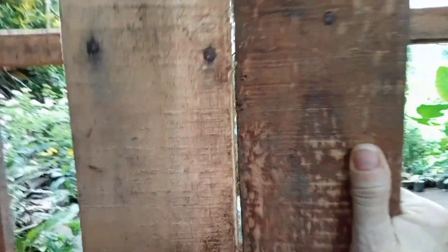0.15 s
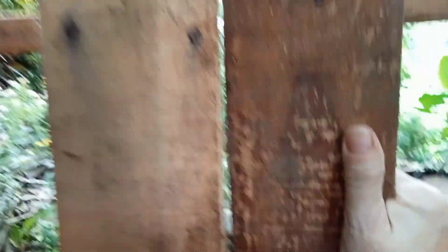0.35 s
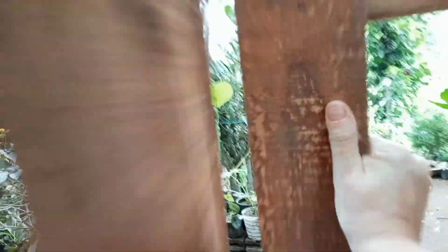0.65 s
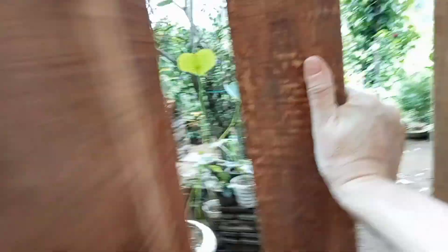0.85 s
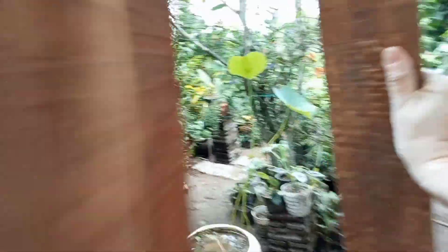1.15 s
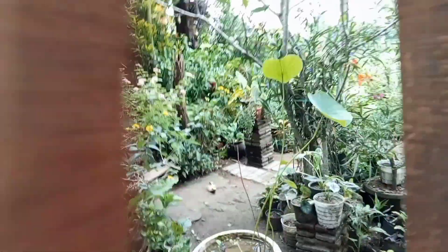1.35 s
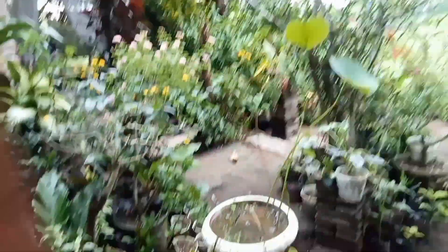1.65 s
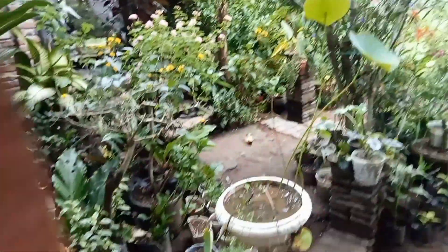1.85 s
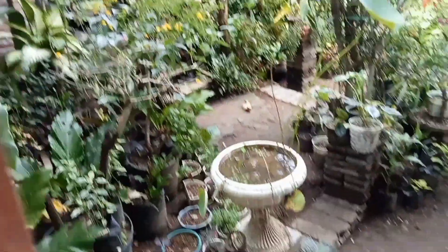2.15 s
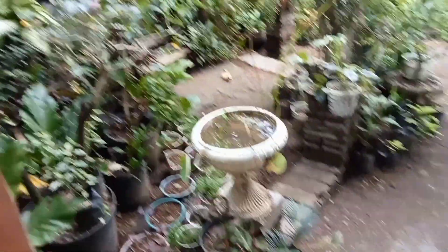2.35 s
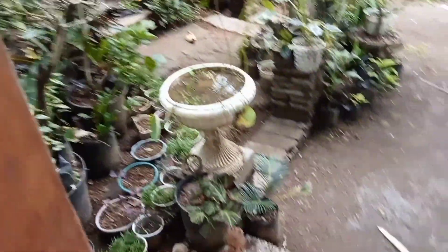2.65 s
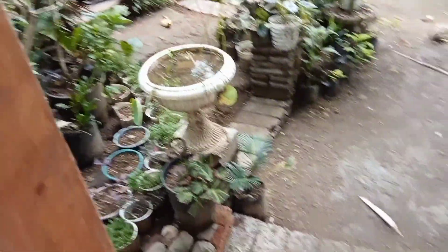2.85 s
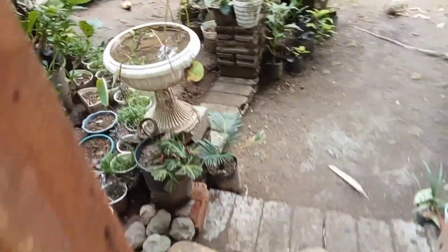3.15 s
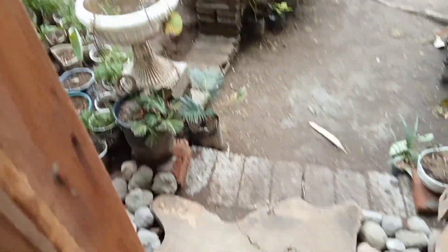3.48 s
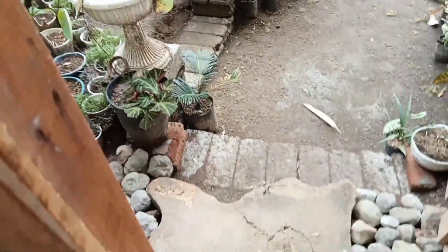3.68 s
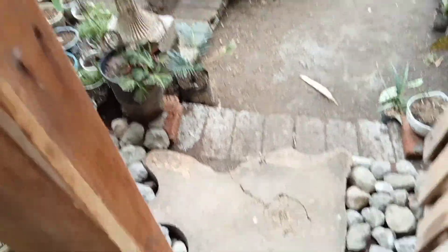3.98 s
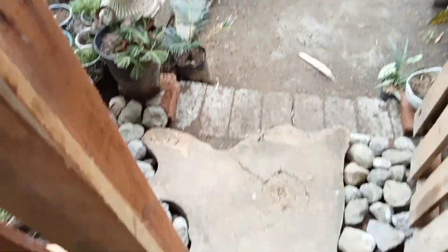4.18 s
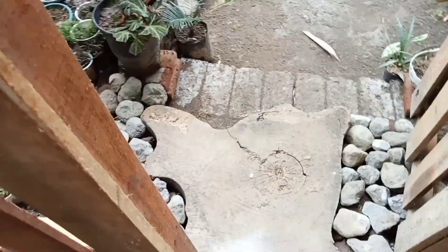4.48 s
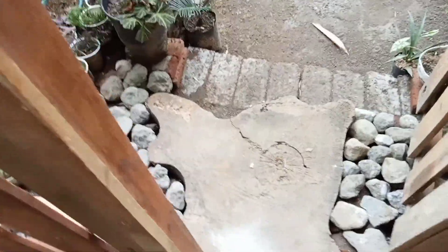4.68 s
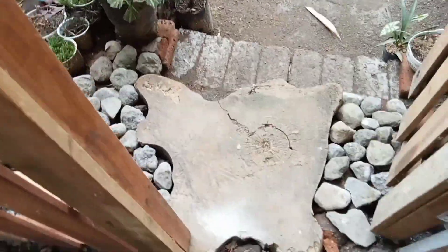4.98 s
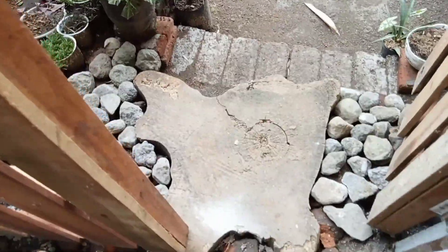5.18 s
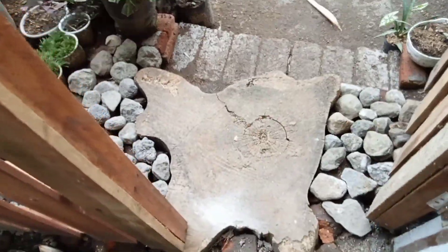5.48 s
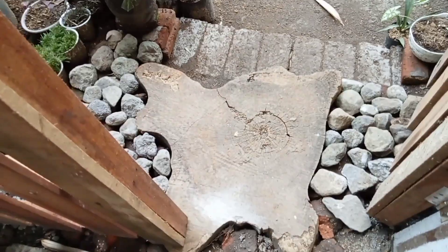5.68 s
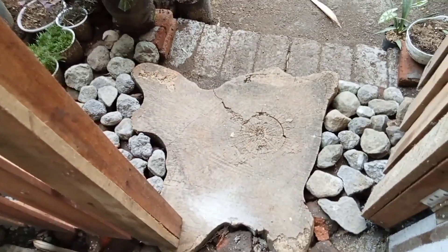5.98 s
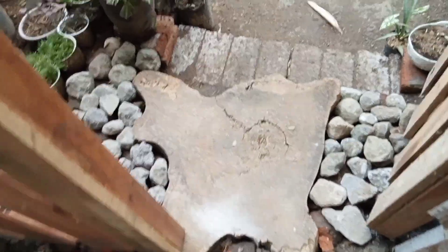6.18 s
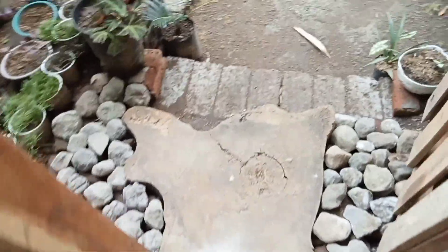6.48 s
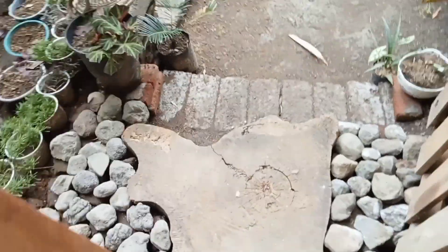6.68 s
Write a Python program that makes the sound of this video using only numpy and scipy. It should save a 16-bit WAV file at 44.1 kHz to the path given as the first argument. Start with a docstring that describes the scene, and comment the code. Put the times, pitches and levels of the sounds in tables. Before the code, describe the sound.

A hand bumps a wooden garden gate, which rubs against its post and jerks free with a loud, shuddering knock. The hinge gives a few tiny squeaks. Later come three slow flip-flop steps on a slab, the first a clear slap and the others duller, with gritty scuffs. Clothes rustle and small handling ticks sound close to the microphone, while insects drone and a distant bird calls faintly.

```python
"""A wooden garden gate rubs, judders free and squeaks; then come three slow steps and gritty scuffs.
The pushed gate grinds on its post until it lets go, and its hinge pin sticks and slips. Flip-flops slap
and drag on the slab between gate and fence. Clothes rustle and a hand-held camera ticks in the grip,
while insects drone, a far bird calls and a motor hums."""
import sys
import numpy as np
from scipy import signal
from scipy.fft import rfft, irfft
from scipy.io import wavfile
from scipy.ndimage import uniform_filter1d

SR = 44100
rng = np.random.default_rng(int(sys.argv[2]) if len(sys.argv) > 2 else 0)


def bounce(signal):
    """Save signal as a 16-bit WAV file at the path given by the first command-line argument."""
    frames = np.transpose(np.atleast_2d(signal))
    limited = np.clip(frames, -1, 1)
    pcm = np.round(limited * 32767).astype(np.int16)
    wavfile.write(sys.argv[1], SR, pcm)


N = 301203

# Tone colours of noises and clicks. Each row: frequency in Hz, relative strength there in dB.
AIR_COLOUR = [(20, -36), (40, -14), (60, -4.5), (90, -1), (170, -4), (270, -6.5), (520, -12), (800, -10),
              (1300, -14.5), (2850, -17.5), (6200, -27.5), (9500, -27), (11500, -33.5), (15500, -41)]
NEAR_INSECT_COLOUR = [(6000, -34.5), (6600, -18), (7100, -12.5), (7900, -24), (8400, -18), (8750, -4.5),
                      (9200, -3), (9900, -5.5), (10300, -16), (10800, -22.5), (12000, -51)]
FAR_INSECT_COLOUR = [(1800, -10.5), (3000, -5), (3950, -1.5), (4300, 1), (4700, -3.5), (5600, -4),
                     (7000, -8), (9000, -22)]
CLOTH_COLOUR = [(300, 3.5), (1000, 3), (1800, 2), (3000, -2), (4700, -1), (6300, -7.5), (8000, -1.5),
                (12000, -8), (15500, -14)]
SHELL_COLOUR = [(2000, -24.5), (4500, -16.5), (7500, -12), (9500, 3.5), (11500, -1), (13500, -5.5),
                (14900, 1), (15700, -5)]  # the camera's casing
PALM_COLOUR = [(50, -27), (120, -6), (165, -0.5), (230, -7.5), (300, -6.5), (420, -17.5), (1300, -23),
               (2200, -41)]  # a dull bump on the gate
GRIT_COLOUR = [(400, -13), (1100, -4.5), (1800, 4), (2400, -2.5), (3500, -16), (4700, -5), (5700, -9),
               (7500, -19.5), (12000, -22)]
SAND_COLOUR = [(1000, -26), (3300, -16), (4000, -3), (4500, 0), (5500, -3), (6300, -14), (12000, -28)]
SOLE_COLOUR = [(35, -52), (70, -14), (150, -17), (230, 2), (400, -17), (620, -3.5), (790, 1), (1080, -5),
               (1270, -10), (1650, -7.5), (2400, -22), (3000, -16), (4080, -30.5), (6000, -27), (9000, -64)]  # rubber slapping the slab
WOOD_RUB_COLOUR = [(60, -23), (180, -10), (320, -0.5), (420, -10), (560, -8), (780, -6), (920, -10),
                   (1010, -0.5), (1180, -13.5), (1330, 2), (1530, -2), (1690, -8.5), (1870, -4),
                   (2100, -8.5), (2900, -9.5), (3170, -2), (3560, -12.5), (3760, -4), (4200, -11),
                   (4600, -5.5), (4950, -14.5), (6500, -16), (9700, -9), (11000, -19.5), (15500, -29)]

# Things that ring. Each row: pitch in Hz, relative level in dB, seconds to fade by 60 dB.
SHELL_TONES = [(14780, -17, .07), (15020, -18, .06)]
GATEWAY_TONES = [(91.5, -3, .26), (200.8, 2, .23), (277, -2.5, .19), (298.5, 1, .2), (378.7, 2, .18),
                 (427, 2, .16), (470.4, 2.5, .15), (542, 2.5, .13), (643, -1, .1), (714, 3.5, .09),
                 (802, 8.5, .115), (850, -4, .15), (1000, 3, .13), (1303, -4, .13), (1405, 1, .09)]  # the air between slab, gate and fence
HINGE_TONES = [(516, -12, .02), (893, 0.5, 0.054), (1005, 0, 0.057), (1480, -3.5, 0.017), (1690, -7, .02),
               (2440, -9.5, 0.022), (3050, -12, .014), (3790, -13, .015)]
PLANK_TONES = [(243, -2, 0.1798), (284.8, -1.5, 0.19), (330.32, -1.5, 0.18), (353.14, 4.5, 0.14),
               (489.41, 1.5, 0.12), (565.15, -5, 0.12585), (657.07, 0.5, 0.07), (791, -6.5, 0.14),
               (843, -4.5, 0.14495), (1000, 3, 0.071), (1110, -4, 0.0734), (1271.4, -4.5, 0.041),
               (1315, 3, 0.06617), (1373.1, 2, 0.065), (1450, -9, 0.0564), (1512.1, 8, 0.069),
               (1620, -2.5, 0.0536), (1788.1, 4, 0.085), (1898, 4.5, 0.076), (2290, -6, 0.1155),
               (2620.2, -11.5, 0.14), (3100, 3, 0.058), (3200, -2, 0.04464), (3753.6, 1, 0.07547),
               (4645, 2, 0.05445)]
FRAME_TONES = [(53.32, -14.5, 0.2537), (91.5, 2.5, 0.21), (114, -5, 0.23), (133, -7, 0.4), (220, -8, 0.17),
               (238.13, 3.5, 0.089), (270.11, -4, 0.091)]  # the whole gate swaying

# Narrow bands of noise. Each row: centre in Hz, width in Hz, level in dB.
HIGH_BANDS = [(9000, 199.1, -70.5), (9183.5, 130, -67.5), (9500, 230, -69), (9807.7, 170, -69)]  # wavering high hiss at 9-10 kHz within the insect drone
PEBBLE_BANDS = [(4382.2, 430.7, -45.5), (6166, 299.4, -49)]
RUBBER_BANDS = [(3100, 220, -47), (4450, 400, -53), (5660, 250, -56)]

# The garden's echo. Each row: frequency in Hz, seconds to fade by 60 dB.
GARDEN_FADES = [(100, 0.48), (300, 0.46), (1000, 0.22), (3000, 0.11), (10000, 0.2)]
# Echoes off slab and boards. Each row: delay in seconds, gain.
STEP_ECHOES = [(0.00271, 0.76), (0.00604, 0.53), (0.0119, -0.25), (0.0168, 0.24), (0.02312, 0.08),
               (0.03113, 0.12)]
# The motor's hum. Each row: pitch in Hz, relative level in dB.
MOTOR_TONES = [(138, -1), (200, -4.5)]
# Swells. Each row: time of the crest in seconds, spread to each side in seconds, relative level in dB.
FAR_INSECT_SWELLS = [(0.7, 1.1485, -66), (3.1, 0.61, -60.5), (4.2, 0.83, -67)]
HUM_SWELLS = [(3.55, 0.25, -61), (4.87, 0.35, -57)]
# Bird calls. Each row: start in seconds, length in seconds, first pitch in Hz, relative level in dB.
BIRD_CALLS = [(0.439, 0.071, 3790, -58), (1.2, 0.097, 4090, -64.5), (1.474, 0.086, 4700, -64),
              (2.189, .085, 3800, -61.5), (5.975, .085, 4150, -63)]
# Movements. Each row: start in seconds, rise in seconds, relative level in dB, seconds to fade by 20 dB.
# A negative fade time makes the sound keep growing slowly.
BODY_MOVES = [(.2, 0.052, -56, 1.8), (.62, 0.14, -45.5, 0.27), (.99, 0.04665, -59.5, 2),
              (2.05, 0.15, -52.5, 0.3258), (3.09, 0.043, -58, 0.25), (3.76, 0.022, -51, 0.5),
              (4.55, 0.072, -55.5, 0.693), (6.48, 0.0466, -52, 0.14), (6.66, 0.04, -59.5, -7.0863)]
SOLE_DRAGS = [(4.57, 0.09, -55.5, .5), (4.78, .04, -57, 0.5), (6.488, 0.0328, -50.5, 0.27),
              (6.71, 0.0289, -60, -7.2628)]
# Shifts of the grip. Each row: start in seconds, relative level in dB, seconds between ticks,
# change in dB from the first tick to the second.
GRIP_SHIFTS = [(0.1108, -36, .012, -12.5), (0.2547, -35, .02, -21), (0.3797, -33, .02, -20),
               (0.569, -39, 0.019, -13), (2.3006, -36.5, 0.02129, -8), (2.374, -39, 0.02172, 2),
               (2.539, -48.5, 0.0253, 0.5), (3.1294, -39.5, 0.022, -1), (3.888, -45.5, .02, -5.5),
               (4.4786, -47.5, .038, -5), (4.616, -41, 0.011, -3), (4.7641, -47.5, 0.01685, -7),
               (6.3079, -35, 0.017, 4.5), (6.6558, -30, 0.02954, -3), (6.766, -34, 0.015, -4.5)]
# Clicks of wood and grit. Each row: start in seconds, level in dB, decay in seconds, centre in Hz.
DRY_CLICKS = [(0.0728, -43, 0.0028, 1290), (.262, -45, .005, 1000), (.56, -47, 0.004853, 2570),
              (1.029, -50.5, 0.02398, 1430), (1.374, -49, 0.004393, 2905), (1.68, -54.5, 0.013, 3200),
              (2.2243, -44, 0.001612, 2280), (3.942, -47, 0.0099, 1306), (3.989, -41, 0.0022, 1459),
              (3.999, -48.5, 0.006394, 1607), (4.721, -48, 0.001568, 1798), (5.1876, -42, 0.0024, 1560),
              (6.5467, -51, 0.00233, 2348), (6.7506, -43.5, 0.00347, 1695)]
# Their tone colour. Each row: multiple of the centre frequency, relative strength in dB.
DRY_CLICK_COLOUR = [(.21, -9.5), (.63, -5), (1, 3), (1.45, -10), (2.45, -21), (4.5, -18.5), (7, -32)]
# Steps. Each row: start in seconds, relative level in dB, treble cutoff in Hz, added heel thud in dB,
# gateway ring in dB.
FOOTFALLS = [(3.7924, 6.5, 3366.0, -6, -40.5), (5.7191, -6.5, 905, -2.9, -36.5),
             (6.681, -13.0, 990, 9.5, -35.5)]
# Slips of the hinge pin. Each row: start in seconds, length of the rasp in seconds, level in dB.
PIN_SLIPS = [(1.087, .008, -41), (1.1165, .012, -49.5), (1.223, .012, -42), (1.252, 0.011, -43),
             (1.261, 0.0083, -47), (1.457, .02, -55.5), (1.651, .02, -56)]
# The gate rubs its post. Each row: start in seconds, length in seconds, relative level in dB,
# treble tilt in dB per octave.
GATE_RUBS = [(0.259, 0.022, -51.5, -9), (0.38, 0.00286, -40, 6), (0.458, 0.037, -45.5, 0),
             (0.467, 0.0184, -41.5, 1), (.474, 0.00293, -33.5, 2), (0.615, 0.06985, -48, 0),
             (0.625, 0.0025, -28, 5), (.634, .003, -32, 2.5), (.6385, .005, -31.5, 2),
             (0.652, .009, -37, 0.5), (0.6861, 0.007758, -30.5, 0.5), (0.696, 0.01502, -35.5, -2.5),
             (0.7074, 0.00535, -15, 0.5), (0.712, 0.0040552, -11.5, -1.5), (0.7159, 0.0037413, -17.5, 0),
             (0.7195, 0.0044377, -12.5, -.5), (.724, 0.00498, -20, -1)]
# The gate jolts. Each row: start in seconds, gain of the planks in dB, gain of the frame in dB.
GATE_JOLTS = [(.625, -50, -47.5), (0.686, -46, -39), (.712, -22, -56.5), (0.7324, -52, -29)]


def gain_of(db):
    """Turns decibels into a gain to multiply by."""
    return 10 ** (np.asarray(db) / 20)


def evened(x):
    """Scales a signal to an average (rms) level of 1."""
    return x / np.sqrt(np.mean(x ** 2) + 1e-20)


def read(points, hz):
    """Looks up values between a table's rows, on a log-frequency scale."""
    known_hz, value = np.transpose(points)
    return np.interp(np.log(hz + 1), np.log(known_hz + 1), value)


def add(mix, start, sound):
    """Adds a sound to the mix at a start time in seconds."""
    part = mix[max(round(start * SR), 0):][:len(sound)]
    part += sound[:len(part)]


def noise(colour):
    """Steady noise with the given tone colour."""
    shape = gain_of(read(colour, np.fft.rfftfreq(N, 1 / SR)))
    return evened(irfft(rfft(rng.standard_normal(N)) * shape, N))


def wander(hz):
    """A random curve that wobbles mostly slower than hz."""
    rolloff = 1 + (np.fft.rfftfreq(N, 1 / SR) / hz) ** 2
    return evened(irfft(rfft(rng.standard_normal(N)) / rolloff, N))


def narrow(hz, width, size):
    """Noise in one narrow band, almost a pitch."""
    peak = signal.iirpeak(hz, hz / width / 1.56, fs=SR)
    return evened(signal.lfilter(*peak, signal.lfilter(*peak, rng.standard_normal(size))))


def click(colour, tilt_db=0, size=2048):
    """A sharp click with the given tone colour; a positive tilt brightens it."""
    hz = abs(np.fft.fftfreq(size, 1 / SR))
    log_gain = np.log(gain_of(read(colour, hz) + tilt_db * np.log2(1 + hz / 500)))
    pulse = np.fft.ifft(np.exp(np.conj(signal.hilbert(log_gain)))).real  # packs the energy at the start
    return pulse / np.linalg.norm(pulse)


def grains(colour, per_s):
    """A random patter of tiny clicks."""
    hits = (rng.random(N) < per_s / SR) * rng.standard_normal(N)
    return evened(signal.oaconvolve(hits, click(colour))[:N])


def burst(colour, decay):
    """A puff of noise that dies away."""
    t = np.arange(SR // 4) / SR
    hiss = signal.fftconvolve(rng.standard_normal(SR // 2), click(colour), "valid")[:len(t)]
    return evened(hiss) * np.exp(-t / decay)


def ping(bands, decay):
    """A few narrow bands of noise that start quickly and die away."""
    t = np.arange(SR // 4) / SR
    tones = sum(gain_of(db) * narrow(hz, width, len(t)) for hz, width, db in bands)
    return tones * np.exp(-t / decay) * (1 - np.exp(-t / 0.002709))


def ring(tones, rise=0):
    """The fading tones of a struck object, which may build up over a rise time."""
    t = np.arange(SR // 2) / SR
    out = sum(gain_of(db - 60 * t / fade) * np.sin(2 * np.pi * hz * t) for hz, db, fade in tones)
    return out * (1 - np.exp(-t / rise)) if rise > 0 else out


def slips(length, per_s, jitter, grit):
    """Surfaces stick and slip: uneven jerks with fine grinding between them."""
    size = max(int(length * SR), 8)
    wobble = evened(uniform_filter1d(rng.standard_normal(SR // 4), SR // 500))[:size]
    rate = per_s * np.exp(jitter * wobble)
    jerks = np.diff(np.floor(np.cumsum(rate) / SR), prepend=-1)
    return evened(evened(jerks) + grit * rng.standard_normal(SR // 4)[:size])


def swells(rows, rest_db):
    """A gain that rises from its resting level in bell-shaped swells."""
    t = np.arange(N) / SR
    bells = (gain_of(db) * np.exp(-.5 * ((t - crest) / spread) ** 2) for crest, spread, db in rows)
    return np.sqrt(gain_of(rest_db) ** 2 + sum(bell ** 2 for bell in bells))


def strokes(rows):
    """A gain for movements that each rise steadily, then fade or slowly grow."""
    t = np.arange(N) / SR
    power = np.zeros(N)
    for start, rise, db, fade in rows:
        onset = np.clip((t - start) / rise, 0, 1)
        power += (onset * gain_of(db - 20 * np.maximum(t - start - rise, 0) / fade)) ** 2
    return np.sqrt(power)


def garden(x, fades=GARDEN_FADES):
    """Scattered echoes from plants and walls, each band dying at its own speed."""
    hz, t, bands = signal.stft(rng.standard_normal(SR), SR, nperseg=256)
    fading = gain_of(-60 * t / read(fades, hz)[:, None])
    tail = signal.istft(bands * fading * (1 - np.exp(-t / .005)), SR, nperseg=256)[1]
    return signal.oaconvolve(x, tail / np.linalg.norm(tail))[:N]


def air():
    """Still air with a far rumble."""
    return noise(AIR_COLOUR) * gain_of(-57.5 + 0.776 * wander(42))


def insects():
    """A high chorus shimmers, while a farther, lower one swells and ebbs."""
    near = noise(NEAR_INSECT_COLOUR) * gain_of(-59 + 0.81 * wander(90) + .5 * wander(6.4))
    high_bands = sum(gain_of(db + 2.3 * wander(12.39)) * narrow(hz, width, N)
                     for hz, width, db in HIGH_BANDS)
    far = noise(FAR_INSECT_COLOUR) * gain_of(2.0 * wander(36.7))
    far += gain_of(-14 + 4 * wander(9)) * narrow(hz=4280, width=160, size=N)  # one wavering voice
    return near + high_bands + swells(FAR_INSECT_SWELLS, rest_db=-81.5) * far


def motor():
    """A distant hum that fades in and out on the way."""
    t = np.arange(N) / SR
    hum = np.zeros(N)
    for hz, db in MOTOR_TONES:
        level = gain_of(db) * (1 + .5 * wander(1.7))
        hum += level * np.sin(2 * np.pi * hz * t + 1.1 * wander(5.02))
    return swells(HUM_SWELLS, rest_db=-69) * hum


def bird(last_hz=2450):
    """A far, husky whistle slides down and is smeared by the leaves."""
    out = np.zeros(N)
    for start, length, first_hz, db in BIRD_CALLS:
        progress = np.linspace(0, 1, int(length * SR))
        hz = first_hz + (last_hz - first_hz) * progress ** 2.1
        hz *= 1 + .045 * wander(400)[:len(hz)]  # a fast wobble makes it husky
        level = gain_of(db) * np.sqrt(abs(np.sin(np.pi * progress ** 1.6)))
        add(out, start, level * np.sin(2 * np.pi * np.cumsum(hz) / SR))
    return 1.15 * out + gain_of(4.5) * garden(out, [(2000, 0.59), (5000, 0.4)])


def clothes():
    """Fibres catch and let go over a soft swish as the body moves."""
    motion = np.hypot(gain_of(-83), strokes(BODY_MOVES))  # never quite still
    swish = 0.8313 * noise(CLOTH_COLOUR) * gain_of(1.716 * wander(80))
    return motion * (swish + 0.5452 * grains(CLOTH_COLOUR, per_s=500))


def shell_tick():
    """One sharp tick of the camera's shell, with a thin high ring and a faint crackle."""
    t = np.arange(SR // 16) / SR
    crackle = 0.32 * np.exp(-t / 0.033) * (rng.random(len(t)) < 900 / SR)
    creak = rng.standard_normal(len(t)) * (1 - np.exp(-t / 0.00064)) * (np.exp(-t / .0011) + crackle)
    snap = gain_of(6.0) * signal.fftconvolve(creak, click(SHELL_COLOUR))[:len(t)]
    return snap + ring(SHELL_TONES, rise=.002)[:len(t)]


def camera_grip(strays_per_s=2):
    """The shell ticks as it gives and settles in the grip, and faintly in between; a finger slides."""
    out = np.zeros(N)
    for start, db, gap, second_db in GRIP_SHIFTS:
        for k, change_db in enumerate([0, second_db, second_db - 13.5]):
            add(out, start + k * gap, gain_of(db + change_db) * shell_tick())
    slide = slips(length=0.044, per_s=380, jitter=0.35, grit=1.712)
    slide *= gain_of(np.linspace(-48, -52.5, len(slide)))
    add(out, 2.302, signal.fftconvolve(slide, click(SHELL_COLOUR, tilt_db=-6)))
    strays = rng.random(N) < strays_per_s / SR
    return out + gain_of(-67) * signal.oaconvolve(strays * 1., shell_tick())[:N]


def contacts():
    """Wood and grit click under hand and foot, with a bump, a clink and a squeak."""
    out = np.zeros(N)
    for start, db, decay, hz in DRY_CLICKS:
        colour = [(hz * multiple, level) for multiple, level in DRY_CLICK_COLOUR]
        add(out, start, gain_of(db) * burst(colour, decay))
    add(out, 0.075, gain_of(-44.5) * burst(PALM_COLOUR, decay=0.048))  # the palm meets the gate
    add(out, 4.252, ping(PEBBLE_BANDS, decay=0.013015))  # a pebble clinks underfoot
    add(out, 6.565, ping(RUBBER_BANDS, decay=0.015))  # the dragging sole squeaks
    return out


def scuffs():
    """Grit rolls under a dragging sole: a fine scrape, a dense patter and brighter cracks of sand."""
    scrape = .47 * noise(GRIT_COLOUR) * gain_of(2.14 * wander(60))
    patter = 0.56 * grains(GRIT_COLOUR, per_s=800)
    cracks = 0.31 * grains(SAND_COLOUR, per_s=170)
    return strokes(SOLE_DRAGS) * (scrape + patter + cracks)


def steps():
    """A rubber sole slaps the slab; boards throw it back and the gateway rings. Soft steps are duller."""
    out = np.zeros(N)
    # the sole flexes as it lands: this filter delays its middle tones and rounds the slap
    flex = signal.iirpeak(850, 1.1, fs=SR)[1]
    slap = signal.lfilter(flex[::-1], flex, click(SOLE_COLOUR))
    blur = signal.windows.hann(SR // 3000)
    echo = np.convolve(slap, blur / blur.sum(), "same")  # rough boards dull what they throw back
    for start, db, cutoff_hz, heel_db, ring_db in FOOTFALLS:
        step = gain_of(ring_db) * ring(GATEWAY_TONES, rise=0.0045)
        add(step, 0, slap)
        for delay, gain in STEP_ECHOES:
            add(step, delay, gain * echo)
        step = signal.sosfilt(signal.butter(3, cutoff_hz, fs=SR, output="sos"), step)
        heel = signal.sosfilt(signal.butter(1, [100, 330], "bandpass", fs=SR, output="sos"), step)
        step = gain_of(db - 2) * (step + gain_of(heel_db) * heel)
        add(out, start, step)
        add(out, start, gain_of(-12.5) * garden(step, [(300, 0.0869), (3000, 0.025)]))
    return out + gain_of(-17.5) * garden(out)


def hinge(rasp_gain=0.59):
    """The pin lets go with a jerk and a short rasp; two close tones of the hinge beat as they die."""
    out = np.zeros(N)
    body = sum((-1) ** k * ring([tone]) for k, tone in enumerate(HINGE_TONES))
    for start, length, db in PIN_SLIPS:
        rasp = slips(length, per_s=470, jitter=.3, grit=1.0)
        jerk = signal.unit_impulse(len(rasp))
        squeak = signal.fftconvolve(jerk + rasp_gain * rasp / np.linalg.norm(rasp), body)
        add(out, start, gain_of(db) * squeak / np.std(squeak[:SR // 80]))
    return out + gain_of(-11.5) * garden(out)


def gate():
    """Wood grinds on wood, then lets go: planks ring and the frame shudders."""
    rubbing, ringing = np.zeros(N), np.zeros(N)
    for start, length, db, tilt_db in GATE_RUBS:
        grind = slips(length, per_s=790, jitter=.5, grit=2.0)
        grind *= signal.windows.tukey(len(grind), .2)  # softens both ends
        add(rubbing, start, gain_of(db - 1) * signal.fftconvolve(grind, click(WOOD_RUB_COLOUR, tilt_db)))
    for start, plank_db, frame_db in GATE_JOLTS:
        add(ringing, start, gain_of(plank_db) * ring(PLANK_TONES, rise=0.003959))
        add(ringing, start, gain_of(frame_db) * ring(FRAME_TONES, rise=0.0092))
    board_echo = gain_of(-13.0) * garden(rubbing, [(300, 0.04736), (8000, 0.0098)])
    return rubbing + ringing + board_echo + gain_of(-17.5) * garden(rubbing + ringing)


def scene():
    """All the sounds together, in one channel."""
    mix = air() + insects() + motor() + gate() + hinge() + steps() + scuffs()
    return (mix + contacts() + camera_grip() + clothes() + bird())[None]


def record(dry):
    """The microphone loses the deepest bass and the highest treble."""
    thinned = signal.sosfilt(signal.butter(2, 35, "highpass", fs=SR, output="sos"), dry)
    treble_cut = signal.firwin(401, 15600, window=("kaiser", 9), fs=SR)
    return signal.oaconvolve(thinned, treble_cut[None], "same")


dry = scene()
out = record(dry)
bounce(out)
```